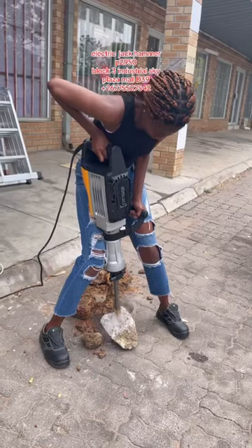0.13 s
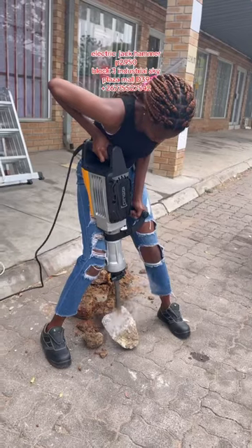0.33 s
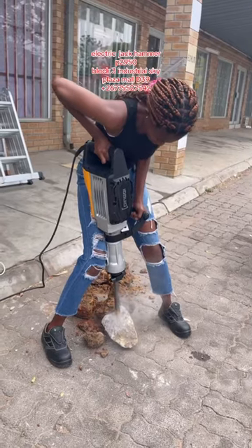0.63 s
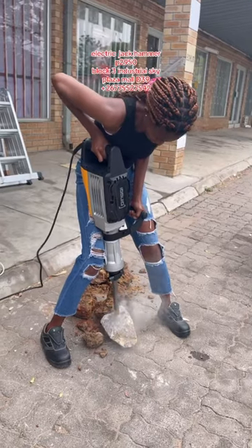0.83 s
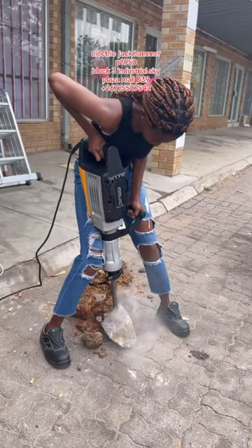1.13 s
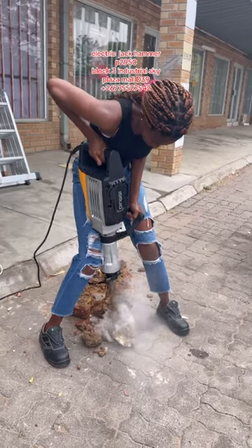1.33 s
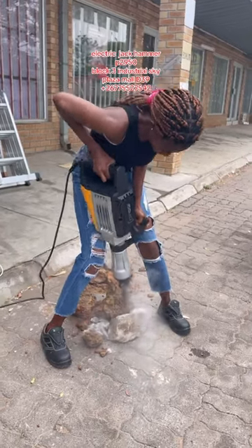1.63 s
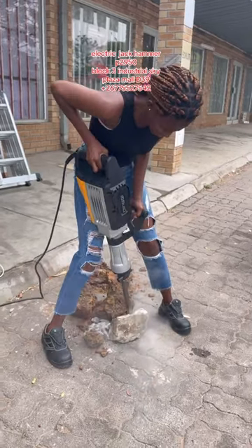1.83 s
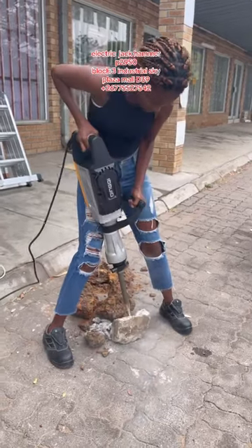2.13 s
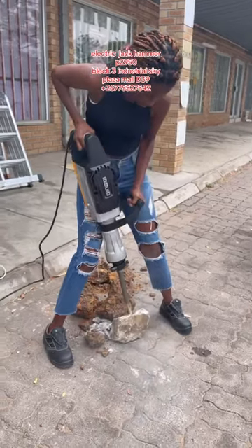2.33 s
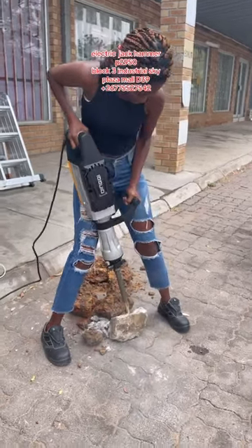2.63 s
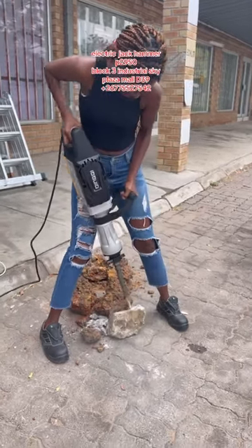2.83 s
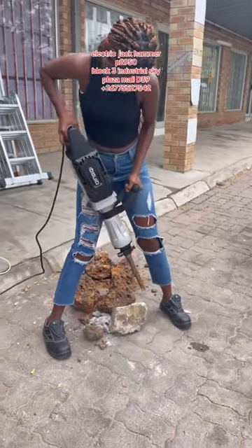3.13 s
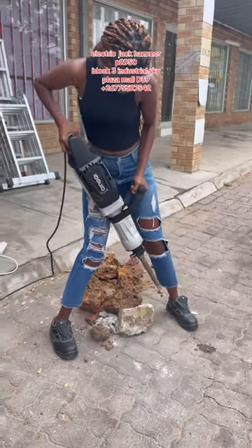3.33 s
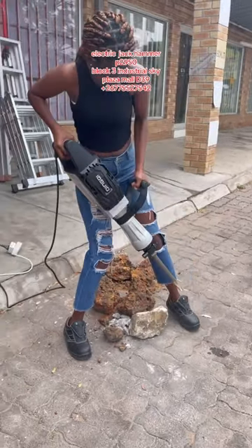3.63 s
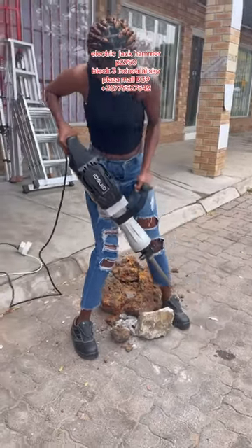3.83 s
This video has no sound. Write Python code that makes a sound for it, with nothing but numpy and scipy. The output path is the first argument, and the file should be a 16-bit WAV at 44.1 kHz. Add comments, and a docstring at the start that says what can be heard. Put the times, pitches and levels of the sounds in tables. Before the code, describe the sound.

An electric jackhammer starts almost at once, pounding rock about 23 times a second with bright steel clanks, gritty crunches and light ground thumps. Blows grow uneven after 1.2 s and end near 1.5 s, with a short reflection off the building. A rough, pulsing fan and gear whirr with a wavering whine continues, then slows and fades from about 2.8 to 4 s over faint engine drone and street rumble.

```python
"""On paving in front of a building an electric breaker hammers a rock, slips off, runs idle and coasts down.
Each blow crushes stone (shaped noise), rings chisel and barrel (dying sines) and thumps the ground (a falling sine).
Gears and fan whirr in the casing: noise and random ticks, swelling once a crank turn, with a ringing whine.
A distant engine drones in sines over a street rumble, and the building answers the blows.
A phone with two spaced microphone ports listens."""
import sys
import numpy as np
from scipy import signal
from scipy.fft import rfft, irfft, next_fast_len
from scipy.io import wavfile
from scipy.ndimage import uniform_filter1d, map_coordinates

SR = 44100
rng = np.random.default_rng(int(sys.argv[2]) if len(sys.argv) > 2 else 0)


def volts_from_db(level):
    """Convert decibel levels to linear amplitude ratios."""
    exponent = np.asarray(level, float) / 20
    return 10 ** exponent


def put_to_file(sound):
    """Save the sound as 16-bit audio at rate SR, in the file named by the first command-line argument."""
    columns = np.atleast_2d(sound).T  # one column per channel
    safe = np.clip(columns, -1, 1)
    whole_steps = np.round(safe * 32767)
    wavfile.write(sys.argv[1], SR, whole_steps.astype(np.int16))


N = 176400  # samples, 4 s


def unit(x):
    """Scale to rms 1."""
    return x / np.sqrt(np.mean(x ** 2) + 1e-20)


def along(points, hz):
    """Read a curve of (Hz, value) points on a log frequency axis."""
    point_hz, value = np.transpose(points)
    return np.interp(np.log(hz + 1), np.log(point_hz + 1), value)


def curves(rows):
    """One value per sample for each column after the time."""
    seconds, *columns = np.transpose(rows)
    return [np.interp(np.arange(N) / SR, seconds, column) for column in columns]


def wobble(rate_hz):
    """A smooth random curve through rate_hz random points a second."""
    knots = rng.standard_normal(int(N * rate_hz / SR) + 4)
    return map_coordinates(knots, [np.arange(N) * rate_hz / SR])


def filtered(x, response):
    """Multiply the spectrum of x by a response, which is a function of frequency."""
    n = x.shape[-1]
    padded = next_fast_len(n + 4096)
    spectrum = rfft(x, padded) * response(np.fft.rfftfreq(padded, 1 / SR))
    return irfft(spectrum, padded)[..., :n]


def above(hz, edge_hz):
    """Share 0-1 of the spectrum kept above a soft edge."""
    return hz ** 4 / (hz ** 4 + edge_hz ** 4)


def patchy(patchy_db):
    """Two noises sharing patches of random gain in time and frequency."""
    z = signal.stft(rng.standard_normal((2, N)), nperseg=256)[2]
    field = uniform_filter1d(rng.standard_normal(z.shape[1:]), size=3, axis=0)
    field = uniform_filter1d(field, size=8, axis=1)
    noise = signal.istft(z * volts_from_db(patchy_db * unit(field)), nperseg=256)[1]
    return unit(noise[:, :N])


# how fast the crank turns: start_s, turns_hz
CRANK_SPEED = [(0, 26.5), (1.4, 24), (1.95, 25.5), (2.75, 22.7), (2.95, 21.15), (3.25, 17), (4, 9.6)]


def fan_and_gear_drive():
    """Fan rush is patchy noise, gear rattle is random ticks; both swell once a crank turn."""
    rattles_per_turn, rattle_db = 32, -10.5  # average count; level against the rush
    stroke_db, stroke_slip_rad = 1.6, .5  # swell each turn, and how far its timing wanders
    flutter_db, flutter_hz = .5, 70
    turns_hz, = curves(CRANK_SPEED)
    angle = 2 * np.pi * np.cumsum(turns_hz) / SR
    ticks = (rng.random(N) < turns_hz * rattles_per_turn / SR) * rng.standard_normal(N)
    rush = patchy(patchy_db=1.3)
    stroke = stroke_db * np.sin(angle + stroke_slip_rad * wobble(4.24))
    flutter = flutter_db * wobble(flutter_hz)
    return (rush + volts_from_db(rattle_db) * unit(ticks)) * volts_from_db(stroke + flutter)


# colour of the fan and gear noise, with the phone's top cutoff near 16 kHz: pitch_hz, level_db (per Hz)
WHIRR_COLOUR = [(150, -18), (400, -5.5), (1000, -2.5), (2000, -4), (3500, -5), (5200, -2), (6000, -7),
                (7500, -6.5), (9500, -11.5), (12500, -25), (15500, -27), (16000, -64)]
# peaks and one narrow dip (7630 Hz) in the whirr: pitch_hz, width_hz, gain_db
CASING_COLOUR = [(716, 140, 2.5), (1354, 33, 6.5), (1600, 130, 3.5), (2023, 400, 6), (3020, 530, 6),
                 (7630, 40, -7)]


def casing_whirr(drive):
    """The casing colours the fan and gear noise: several peaks and a narrow dip near 7.6 kHz."""
    def body(f):
        gain_db = sum(db / (1 + (2 * (f - c) / w) ** 2) for c, w, db in CASING_COLOUR)
        return volts_from_db(along(WHIRR_COLOUR, f) + gain_db)
    return unit(filtered(drive, body))


# narrow ringing of the gearbox: pitch_hz, width_hz, level_db (against each other)
WHINE_RINGS = [(2448, 187, 0.5), (772, 36, 0), (3833, 82, -8), (4245, 67, -7.5), (4950, 480, -10.5)]


def gear_whine(drive):
    """The same drive rings the gearbox in narrow bands that waver; those near 4 kHz swell briefly."""
    waver_db, waver_hz = 2.5, 14
    swell_s, swell_width_s, swell_peak_db = 2.9, .14, 11
    seconds = np.arange(N) / SR
    swell_db = swell_peak_db * np.exp(-((seconds - swell_s) / swell_width_s) ** 2)

    def bands(f):
        return np.array([volts_from_db(db) / (1 + (2 * (f - c) / w) ** 2) for c, w, db in WHINE_RINGS])
    rings = filtered(drive[:, None], bands)
    gain_db = [waver_db * wobble(waver_hz) + swell_db * (abs(c - 4000) < 500) for c, _, _ in WHINE_RINGS]
    return unit((rings * volts_from_db(gain_db)).sum(1))


# how the motor changes: start_s, whirr_db (before an overall trim),
# low_mids_db, treble_db, whine_db (these three over the whirr)
MOTOR_LEVELS = [(.05, -28.5, 7, 8, -13), (.12, -34, 6, 11, 0.5), (.6, -35, 3.5, 7, -12.5),
                (1.28, -38, 7, 8.5, -1), (1.5, -36.5, 1, -2, -8.5), (1.75, -34, -2, -2, -15.5),
                (2.02, -33, -3, -2.5, -11), (2.07, -32, 2, 2.5, -4), (2.3, -32, -1, 3, -5.5),
                (2.68, -32, 1, 4, -9.5), (2.9, -36.5, 0, 4, -5.5), (3.3, -40, -2, -1.5, -8.5),
                (3.55, -42.5, 1.5, -0.5, 0), (3.68, -44, -1, -4, -1), (3.75, -46.5, 1.5, 0, -2.5),
                (4, -47, -0.5, -16, -4)]


def motor():
    """Whirr, its low mids and treble, and gear whine follow their own levels; two partly unlike copies."""
    low_hz, treble_hz = 1380, 8200  # where the low mids end and the treble starts
    whirr_db, low_db, treble_db, whine_db = curves(MOTOR_LEVELS)
    drive = fan_and_gear_drive()
    whirr = casing_whirr(drive)
    low = filtered(whirr, lambda f: 1 - above(f, low_hz))
    treble = filtered(whirr, lambda f: above(f, treble_hz))
    whirr = whirr + (volts_from_db(low_db) - 1) * low + (volts_from_db(treble_db) - 1) * treble
    return volts_from_db(whirr_db - 1.5) * (volts_from_db(whine_db) * gear_whine(drive) + whirr)


# far engine: start_s, firing_pitch_hz, first_order_db, higher_orders_db (rms, before wavering)
ENGINE_COURSE = [(0, 67, -47, -48.5), (1.4, 67.1, -55, -83), (2.1, 65.8, -69, -61), (2.3, 67.44, -53, -48),
                 (2.7, 66.7, -51, -60), (3.15, 67.97, -57, -45), (3.8, 68.6, -50.5, -47.5),
                 (4, 67.4, -55, -60)]
# higher engine orders: multiple (of the firing pitch), level_db (added to higher_orders_db)
HIGHER_ORDERS = [(2, -1.5), (3, -10.5), (4, -12.5)]


def engine_drone():
    """A distant engine sounds as sines at its firing pitch and multiples, each wavering in level."""
    pitch_hz, first_db, higher_db = curves(ENGINE_COURSE)
    angle = 2 * np.pi * np.cumsum(pitch_hz * (1 + 0.004 * wobble(7.3))) / SR
    drone = sum(volts_from_db(higher_db + db + 1.5 * wobble(6.0)) * np.sin(k * angle) for k, db in HIGHER_ORDERS)
    drone += volts_from_db(first_db + 2 * wobble(22)) * np.sin(angle)
    return np.sqrt(2) * drone  # turns rms into peak


# colour of the street rumble: pitch_hz, level_db (per Hz)
RUMBLE_COLOUR = [(13, -66), (22, -2.5), (60, -0.5), (140, -5.5), (284, -4.5), (402, -13.5), (600, -8),
                 (780, -14.5), (1320, -120)]


def street():
    """The engine drone over traffic rumble, which is low patchy noise."""
    drone = engine_drone()
    rumble = unit(filtered(patchy(patchy_db=-3.0), lambda f: volts_from_db(along(RUMBLE_COLOUR, f))))
    return drone + volts_from_db(-47.5) * rumble


def crushing_contact(t):
    """Push on the stone: a quick rise, a fast crushing decay, then slower debris and rattle."""
    rise_s, crush_t60_s, after_t60_s, after_db = .0012, .013, .065, -16
    decay = volts_from_db(-60 * t / crush_t60_s) + volts_from_db(after_db - 60 * t / after_t60_s)
    contact = (1 - np.exp(-t / rise_s)) ** 2 * decay
    return contact / contact.max()


# ringing of rock, barrel and chisel: pitch_hz, level_db (against each other), t60_s (time to fall 60 dB)
STEEL_MODES = [(685, -6, .045), (880, -6, .025), (960, -3, .03), (1165, 0, .03), (1400, -5, .035),
               (1575, -4, .035), (1750, -5, .03), (1950, -8, .03), (2580, -6, .025), (3340, -4, .02),
               (4260, -6, .025), (5030, -4, .03), (6330, -10, .03), (7460, 4, .065), (12550, -17, .06)]


def steel_ring(t, contact, grit, bite_hz):
    """Sharp impact and gritty contact excite dying sines, scattered a little each blow."""
    same_contact = .9  # share of the force power that repeats each blow
    scatter_db, upper_scatter_db, detune = 1.2, 2.5, .004  # detune is a fraction of the pitch
    hz, level_db, t60_s = np.transpose(STEEL_MODES)[:, :, None]
    level_chance, pitch_chance = rng.standard_normal((2, len(STEEL_MODES), 1))
    spread_db = scatter_db + upper_scatter_db * ((hz > bite_hz) & (hz < 7000))
    decay = volts_from_db(level_db + spread_db * level_chance - 60 * t / t60_s)
    modes = decay * np.sin(2 * np.pi * hz * (1 + detune * pitch_chance) * t)
    impact = np.linalg.norm(contact) * (contact == 1)  # the striker's single click, in the first copy
    force = np.sqrt(1 - same_contact) * grit * contact + np.sqrt(same_contact) * impact * [[1], [0]]
    ring = signal.fftconvolve(force, modes.sum(0)[None], axes=1)[:, :len(t)]
    ring = filtered(ring, lambda f: above(f, 628))
    return ring / abs(ring[0]).max()


# colour of the crunch, with a steep top cutoff near 16 kHz: pitch_hz, level_db (per Hz)
CRUNCH_COLOUR = [(450, -90), (850, -2), (1500, -5), (2500, -5.5), (5000, -6.5), (7000, -7.5), (9000, -13.5),
                 (15600, -23), (16300, -48)]


def stone_crunch(t, contact, grit):
    """Crushed stone is noise shaped by the contact, with its own colour and lumpy tail each blow."""
    points, colour_db, chatter_db = 30, 2.5, 2.5
    colour, lumps = rng.standard_normal((2, points))
    lump_curve = np.interp(t, np.linspace(0, .065, points), lumps)
    chatter = volts_from_db(chatter_db * lump_curve * (t > .013))  # only after the crushing

    def stone(f):
        own_colour = np.interp(f, np.linspace(0, SR / 2, points), colour)
        return volts_from_db(along(CRUNCH_COLOUR, f) + colour_db * own_colour)
    return contact * chatter * unit(filtered(grit, stone))


def ground_thump(t):
    """The ground answers with a sine that falls in pitch and dies away."""
    start_hz, end_hz, fall_s = 432, 120.4, .0053
    rise_s, t60_s, bass_cut_hz = .0013, .069, 94.5
    pitch_hz = end_hz + (start_hz - end_hz) * np.exp(-t / fall_s)
    swing = np.sin(2 * np.pi * np.cumsum(pitch_hz) / SR)
    thump = swing * (1 - np.exp(-t / rise_s)) ** 2 * volts_from_db(-60 * t / t60_s)
    thump = filtered(thump, lambda f: above(f, bass_cut_hz))
    return thump / abs(thump).max()


# blows of the chisel: start_s (before a short delay), level_db (relative),
# bite_db (boost of the upper mids and treble), thump_db (relative to the usual ground thump)
CHISEL_BLOWS = [(0.075, -11.5, 10, 6.5), (0.117, -3, -4.5, -3), (0.153, 0, 0.5, -2), (0.194, -1, 0, -0.5),
                (0.236, -2.5, 0.5, 3), (0.276, 0, -0.5, -0.5), (0.318, 2.5, -6, -5), (0.363, -2, -3.5, 0),
                (0.402, 0, -1.5, -0.5), (0.447, 3, -4, -5.5), (0.49, 0.5, -2.5, -1.5),
                (0.534, -2.5, -1.5, -1), (0.577, -2, -0.5, -2.5), (0.621, -2, -3, -3), (0.665, -1, -3, -3),
                (0.708, -2, -0.5, -2.5), (0.753, -3.5, -1, -1), (0.794, -3.5, 1.5, 1.5),
                (0.839, -3, -1.5, -2.5), (0.884, -5, 2, -4), (0.927, -6.5, 2, 2), (0.971, -2, 0, -12),
                (1.015, -2.5, -2, 0.5), (1.06, -2, -0.5, -2), (1.105, -2.5, -1.5, 1), (1.153, -5, 1, 2.5),
                (1.201, -1, -5, -2), (1.248, -6, 1.5, 2), (1.298, -11, 12, 4.5), (1.351, -2, 2, -27),
                (1.401, -12, 5, -10), (1.453, -10, 5, -29)]


def blows():
    """Each blow rings steel and crushes stone, then thumps the ground; two partly unlike copies."""
    ring_db, crunch_db, usual_thump_db = -2.5, -3.5, -23.5  # the crunch is halved as well
    bite_hz, delay_s, thump_lag_s = 1880, .001, .00481
    spread_cycles = 1.6  # lower frequencies arrive later through the slab
    out, t = np.zeros((2, N + SR)), np.arange(SR // 8) / SR
    contact, thump = crushing_contact(t), ground_thump(t)
    for start_s, level_db, bite_db, thump_db in CHISEL_BLOWS:
        ring_grit, stone_grit = rng.standard_normal((2, 2, len(t)))
        ring = steel_ring(t, contact, ring_grit, bite_hz)
        crunch = stone_crunch(t, contact, stone_grit)
        blow = volts_from_db(ring_db) * ring + volts_from_db(crunch_db) * crunch / 2

        def slab(f):
            lateness = np.exp(-2j * np.pi * spread_cycles * np.log((f + 150) / SR))
            return volts_from_db(bite_db * above(f, bite_hz)) * lateness
        blow = filtered(blow, slab)
        first = round((start_s + delay_s) * SR)
        out[:, first:first + len(t)] += volts_from_db(level_db) * blow
        first = round((start_s + thump_lag_s) * SR)
        out[0, first:first + len(t)] += volts_from_db(level_db + usual_thump_db + thump_db) * thump
    return out[:, :N]


# how long the building front answers: pitch_hz, t60_s (time to fall 60 dB)
WALL_DECAY = [(200, 0.44), (2000, 0.28), (10000, 0.34)]


def wall(x):
    """The building answers with a noise tail; each frequency dies at its own speed."""
    hz, _, z = signal.stft(rng.standard_normal((2, SR // 3)), SR, nperseg=256)
    frame_s = signal.stft(np.zeros(SR // 3), SR, nperseg=256)[1]
    decay = volts_from_db(-60 * frame_s / along(WALL_DECAY, hz)[:, None])
    tail = signal.istft(z * decay, SR, nperseg=256)[1]
    late = np.pad(x, (450, 0))  # about 10 ms on the way to the wall and back
    return signal.fftconvolve(late[None], tail / np.linalg.norm(tail[0]), axes=1)[:, :N]


# likeness of left and right, near 1 in bands where their difference is hardly heard:
# pitch_hz, likeness (1 = the same)
STEREO_LIKENESS = [(40, .97), (500, .95), (1900, .995), (2700, .75), (4500, .6), (5600, .95), (6400, .75),
                   (7200, .99), (8700, .98), (9400, .8), (10200, .998), (12000, .998), (12800, .8),
                   (13600, .99), (15200, .96), (16000, .6)]


def scene():
    """Two versions of the sound field, shared between left and right to set how alike they sound."""
    hits = blows()
    field = hits + motor() + street() + volts_from_db(-13.5) * wall(hits[0])

    def shares(f):
        turn = np.arccos(along(STEREO_LIKENESS, f)) / 2
        return np.array([np.cos(turn), np.sin(turn)])
    mid, side = filtered(field, shares)
    return np.array([mid + side, mid - side])


def top_cut(x):
    """Nothing passes above the cut-off."""
    return signal.sosfilt(signal.butter(12, 17120, fs=SR, output="sos"), x)


# phase of left against right, rising overall with pitch in uneven steps: pitch_hz, phase_rad
STEREO_PHASE = [(0, 0), (2600, .05), (4300, 1.5), (5400, .2), (6000, .7), (7000, np.pi), (8900, np.pi),
                (9900, 2 * np.pi), (12200, 2 * np.pi), (13300, 3 * np.pi), (17000, 3 * np.pi)]
# level of left against right: pitch_hz, tilt_db (left minus right)
STEREO_TILT = [(60, -1.3), (600, -4), (1300, -1.8), (2400, -1), (4200, 1), (5000, -2), (8000, 0)]


def record(dry):
    """Left and right differ in phase and in level; the phone starts late and cuts the deep bass."""
    start_s, bass_cut_hz = .0452, 48

    def ports(f):
        phase_rad = np.interp(f, *np.transpose(STEREO_PHASE))
        left = volts_from_db(along(STEREO_TILT, f) / 2) * np.exp(.5j * phase_rad)  # half on each side
        return np.array([left, 1 / left]) * above(f, bass_cut_hz)
    heard = filtered(dry, ports)
    mix = heard * (np.arange(N) >= start_s * SR)
    return top_cut(mix)


dry = scene()
out = record(dry)
put_to_file(out)
```